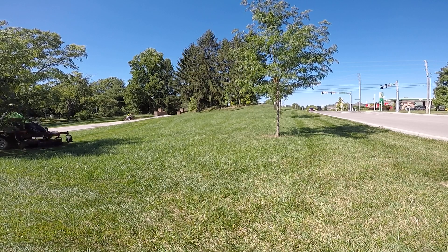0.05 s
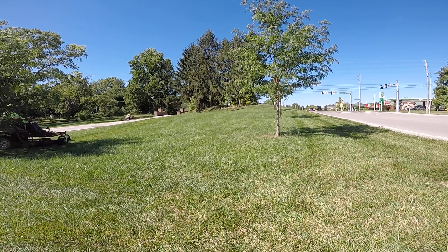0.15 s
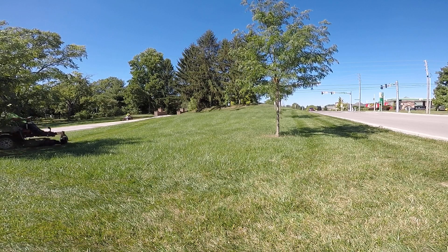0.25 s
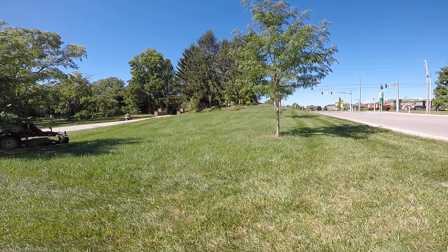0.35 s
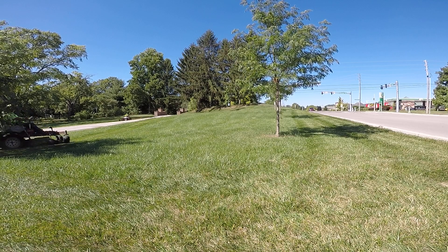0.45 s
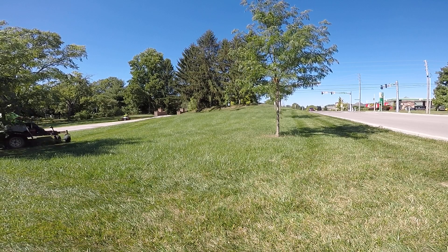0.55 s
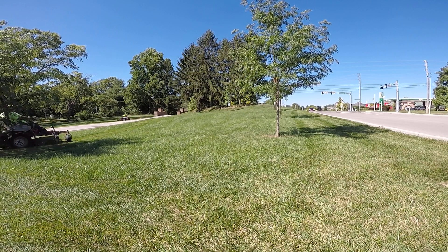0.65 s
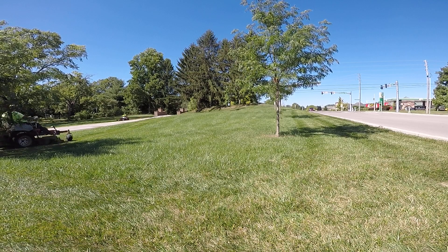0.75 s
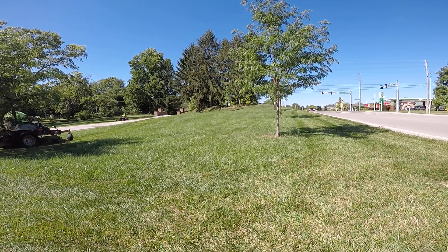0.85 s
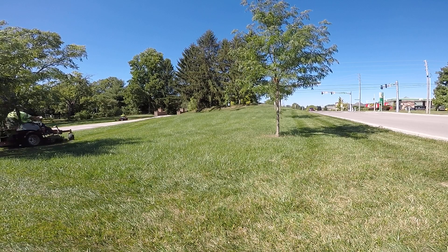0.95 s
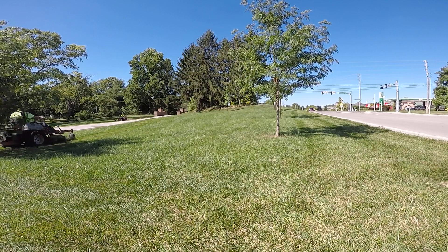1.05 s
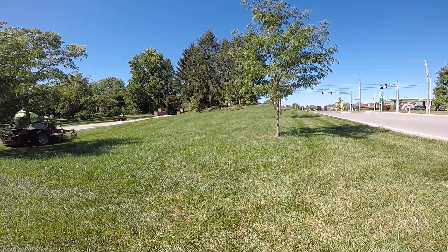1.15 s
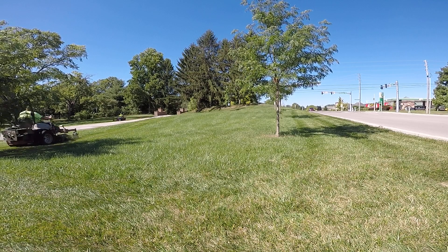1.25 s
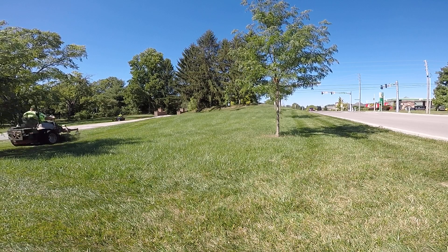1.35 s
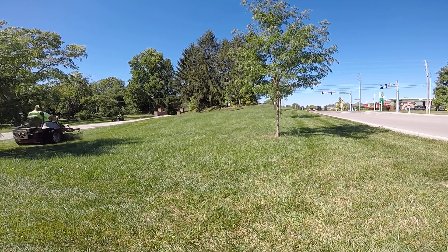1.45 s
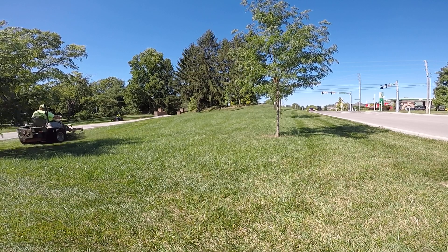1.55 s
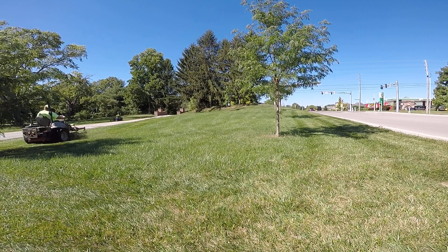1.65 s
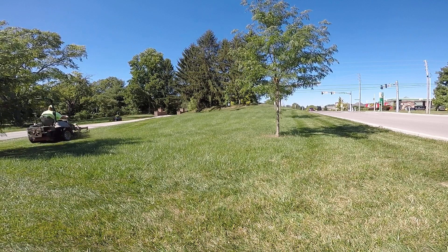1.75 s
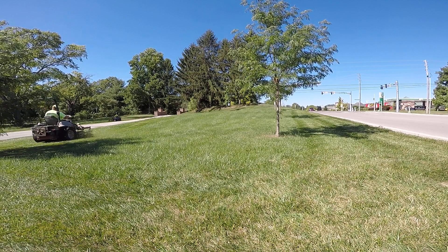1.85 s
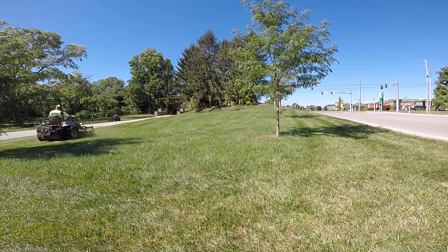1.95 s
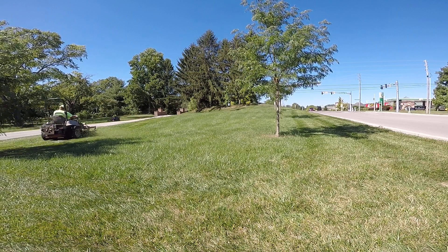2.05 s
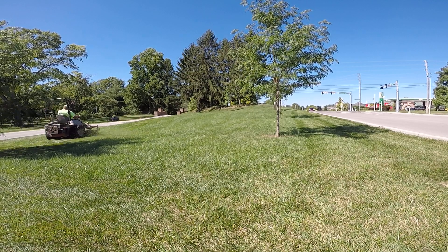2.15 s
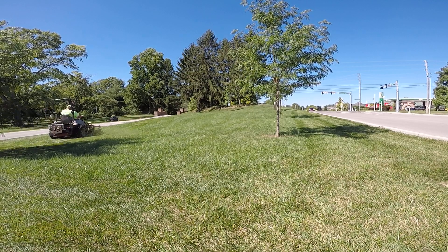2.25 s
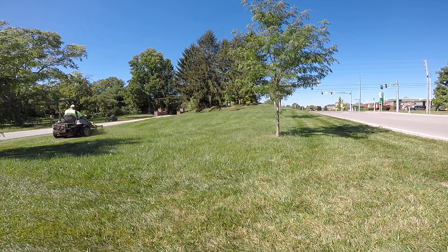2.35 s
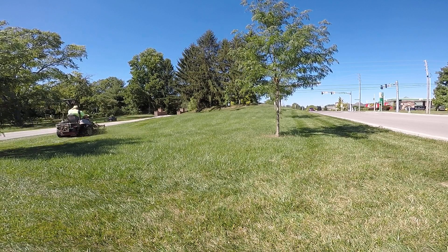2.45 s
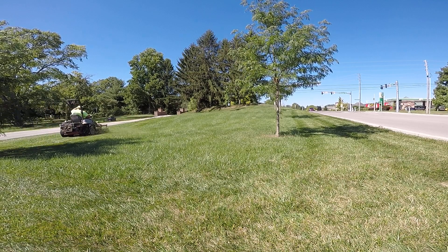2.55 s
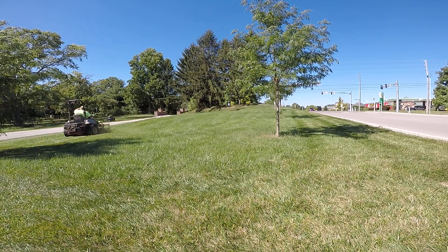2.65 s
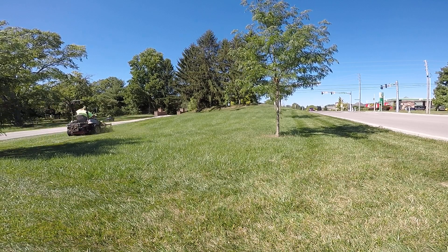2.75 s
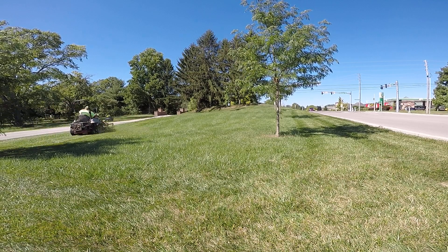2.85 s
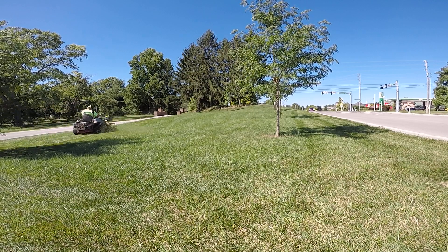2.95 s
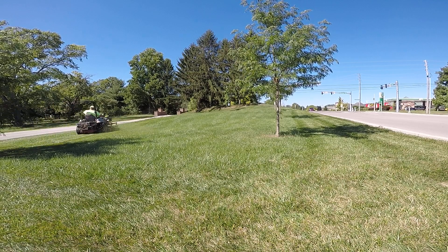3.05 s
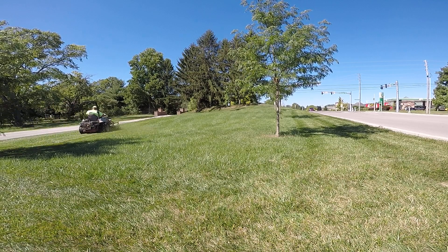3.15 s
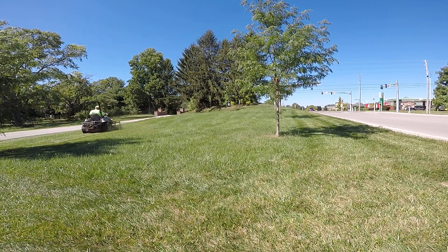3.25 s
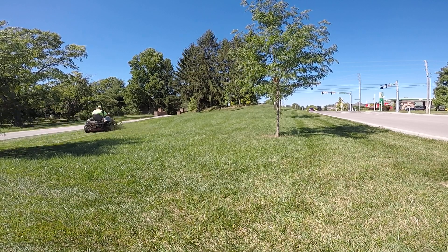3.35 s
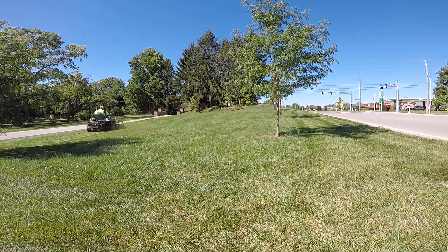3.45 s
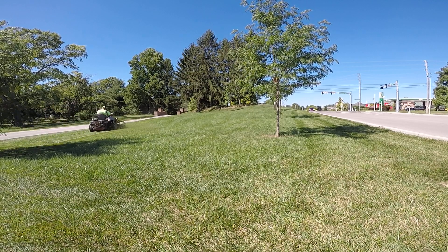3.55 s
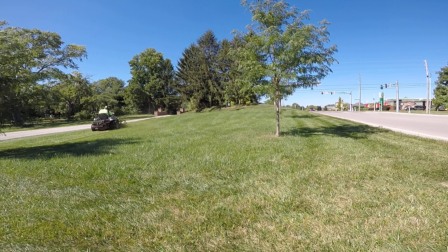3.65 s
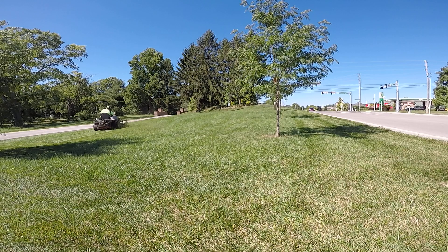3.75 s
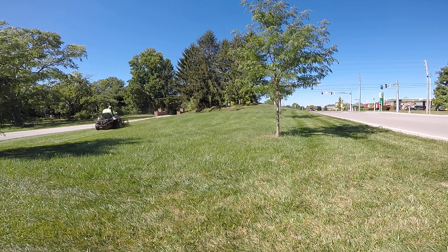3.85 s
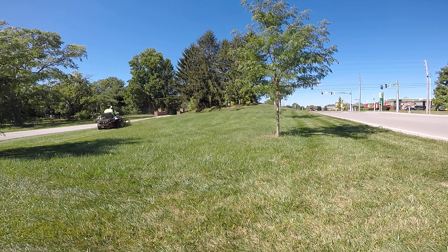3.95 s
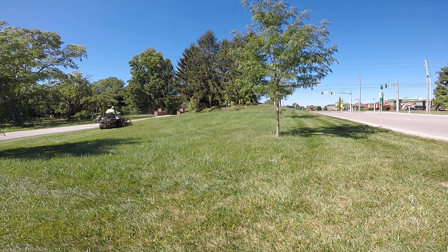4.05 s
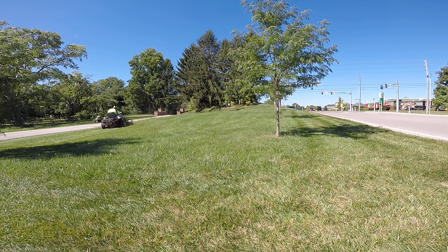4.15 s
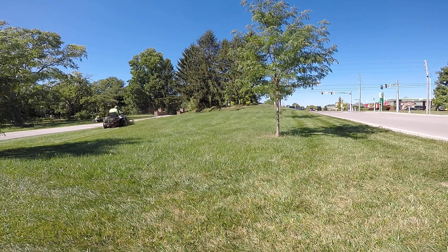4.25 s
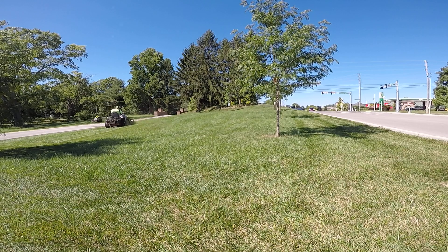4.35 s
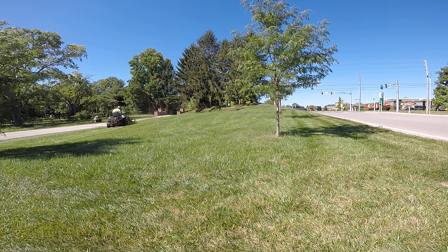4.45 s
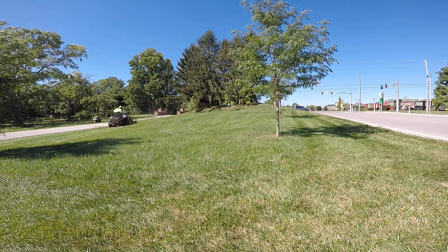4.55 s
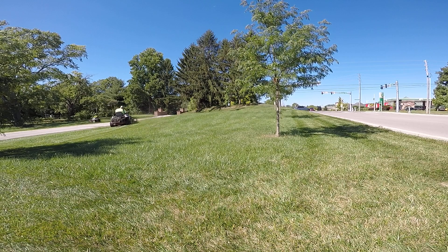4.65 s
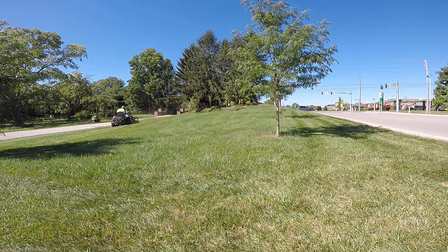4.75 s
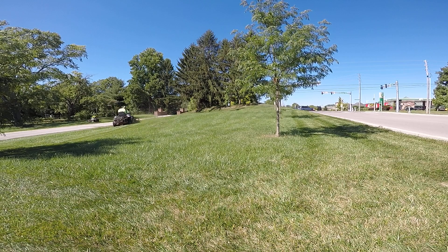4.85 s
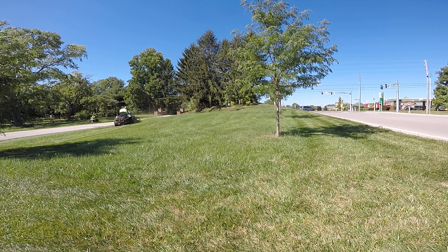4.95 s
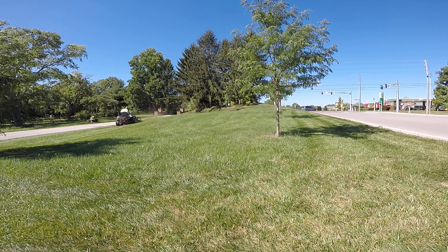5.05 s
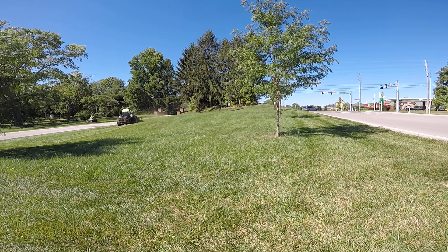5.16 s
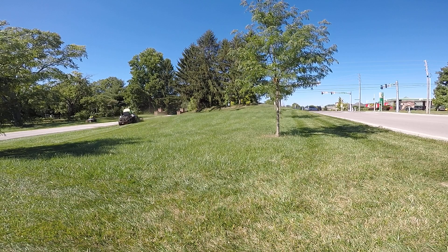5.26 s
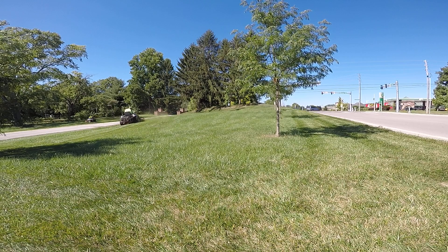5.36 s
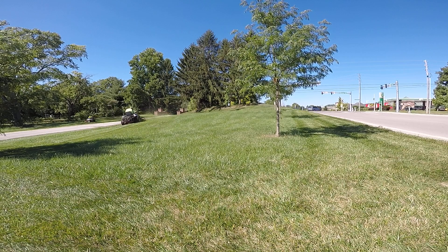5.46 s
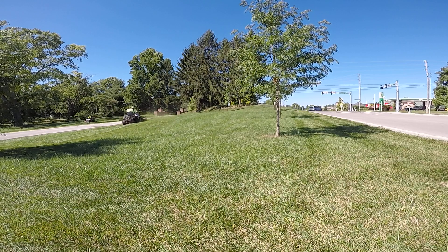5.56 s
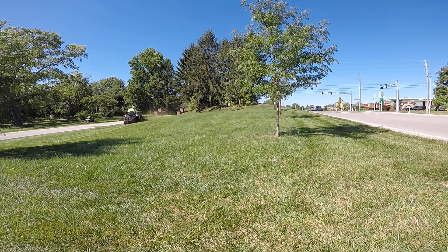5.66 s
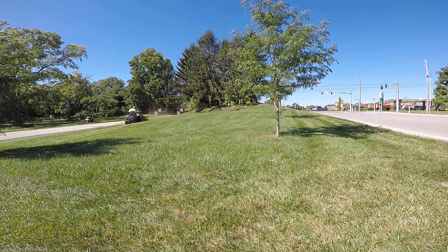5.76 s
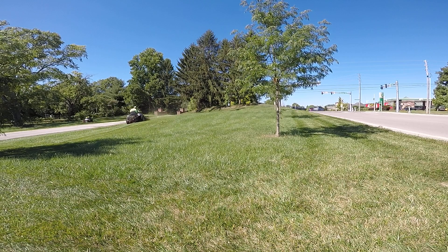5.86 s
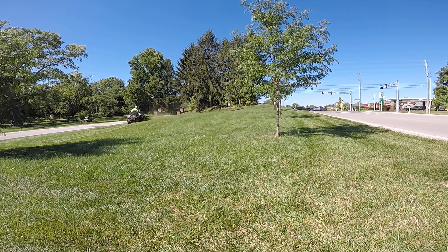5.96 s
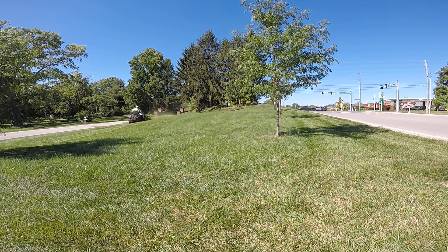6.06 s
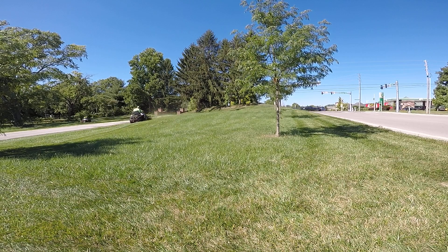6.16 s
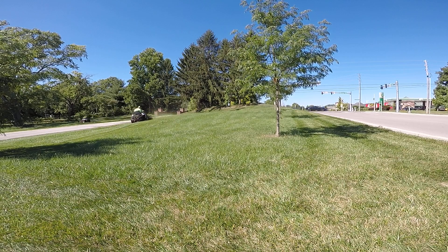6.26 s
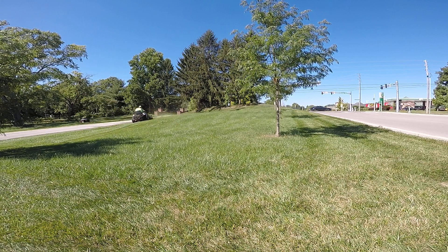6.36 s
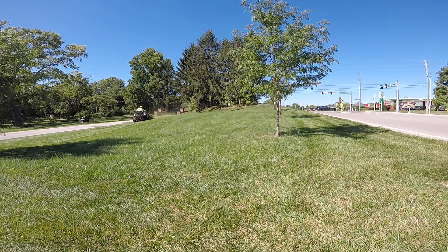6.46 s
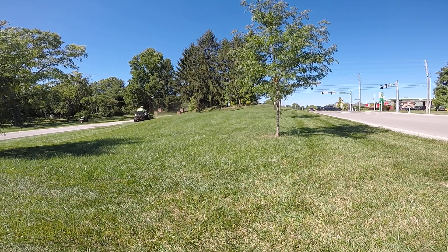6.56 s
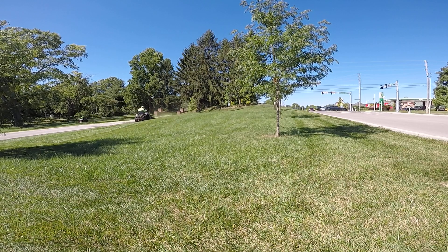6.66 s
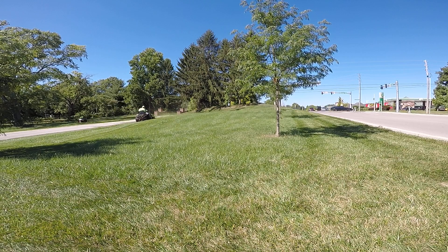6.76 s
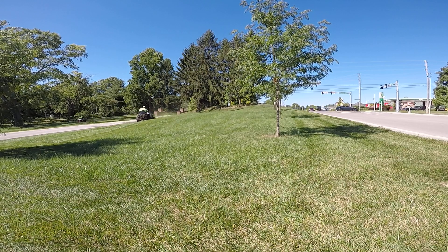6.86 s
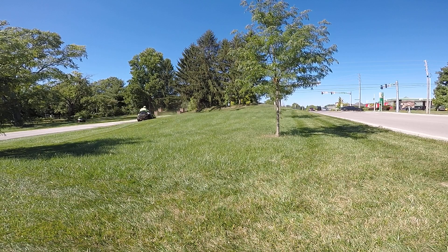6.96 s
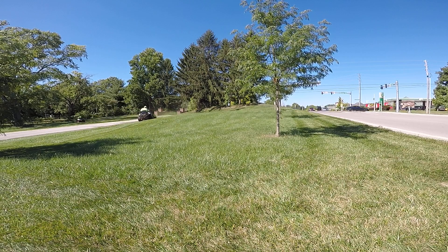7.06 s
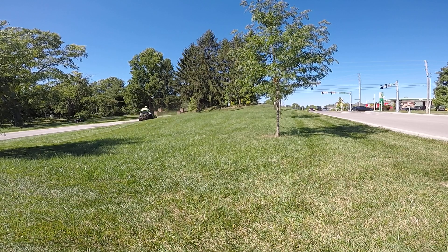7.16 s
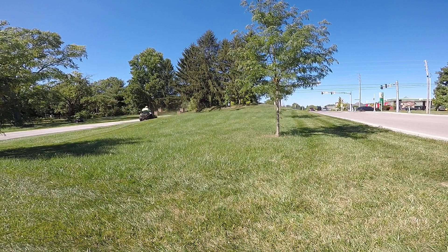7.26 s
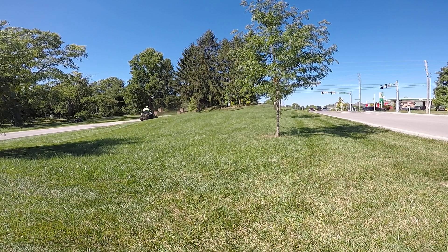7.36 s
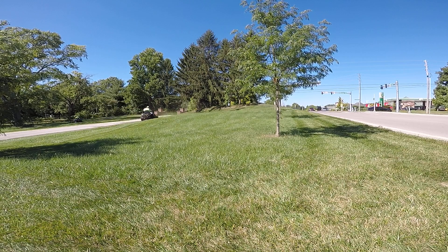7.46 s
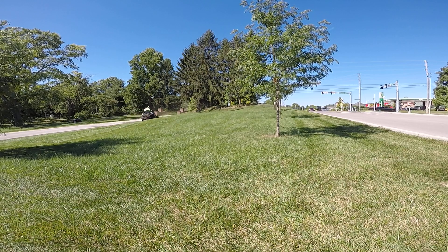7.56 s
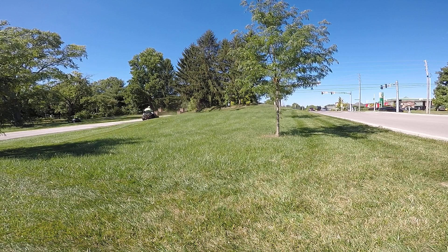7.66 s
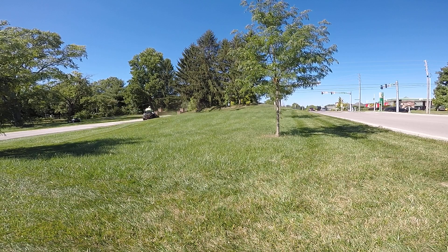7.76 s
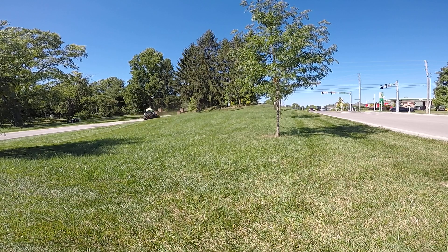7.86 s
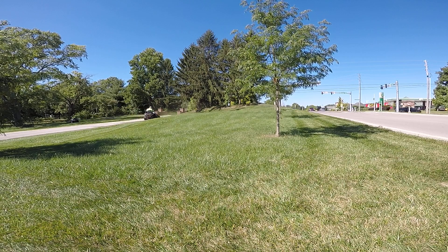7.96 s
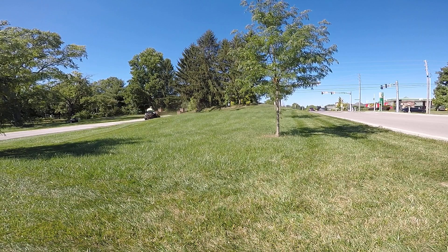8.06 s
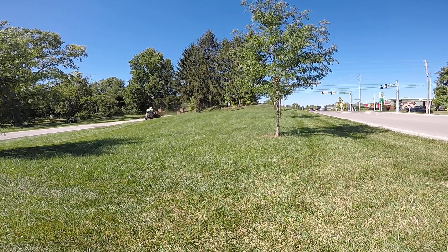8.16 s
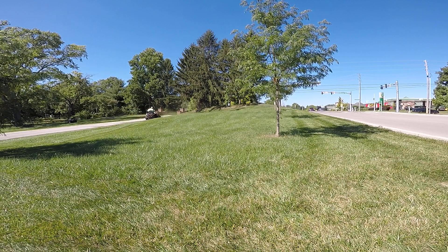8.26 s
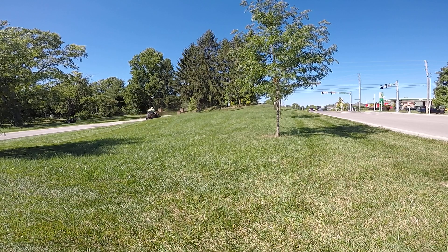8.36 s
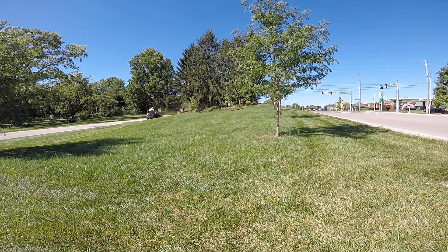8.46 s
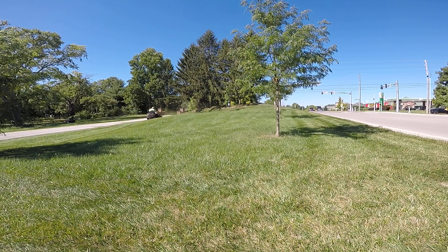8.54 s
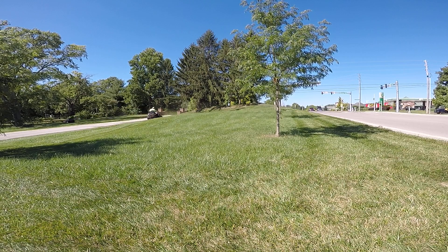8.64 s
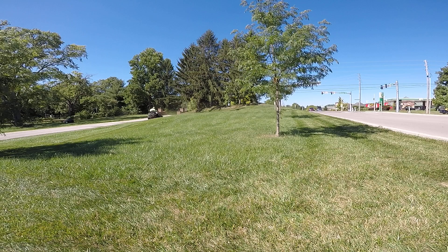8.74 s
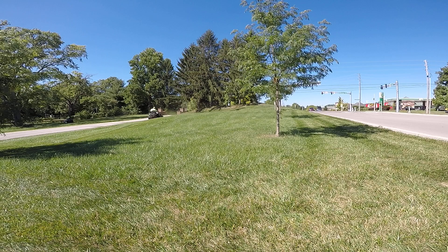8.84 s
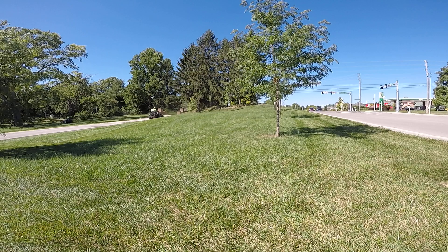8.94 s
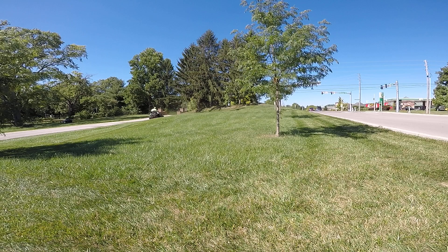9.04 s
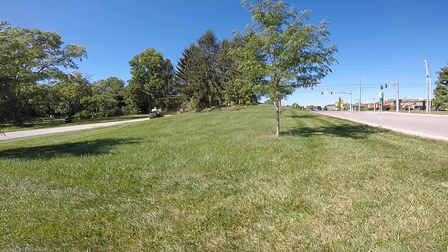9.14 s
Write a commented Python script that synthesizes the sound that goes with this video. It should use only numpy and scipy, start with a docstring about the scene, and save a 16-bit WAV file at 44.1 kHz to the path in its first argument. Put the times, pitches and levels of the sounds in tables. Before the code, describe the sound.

Outdoor stereo pickup on a roadside lawn: continuous mower engine drone with whirring blades and broad clattering noise, pitch sagging slightly in thick grass. The machine recedes, its low roar sinking quickly while chattering exhaust bursts stay present through the middle. Another mower out of sight adds a wavering hum and late hiss. Distant traffic is barely audible, with a few soft low wind swells.

```python
"""A riding mower drives off across a lawn beside a road while a second one works out of sight.
Each twin-cylinder engine fires unevenly, giving a stack of cycle harmonics and chopped, clattering noise;
belt-driven blades hum at their own rate, and the two machines beat against each other.
Behind them lie the filtered-noise wash of distant traffic and light wind, picked up at two ports."""
import sys
import numpy as np
from scipy import signal
from scipy.fft import rfft, irfft, next_fast_len
from scipy.io import wavfile
from scipy.ndimage import uniform_filter1d

SR = 44100
rng = np.random.default_rng(int(sys.argv[2]) if len(sys.argv) > 2 else 0)


def persist_wave(psi):
    """Save psi, clipped to +-1, as 16-bit WAV."""
    counts = np.round(np.clip(psi, -1, 1) * 32767).astype(np.int16)
    wavfile.write(sys.argv[1], SR, np.atleast_2d(counts).T)


N = 405719
TIME = np.arange(N) / SR

SECOND_FIRING = 3 / 8  # cycles: the second cylinder fires 270 of 720 degrees later
LEAVING_LAG, UNSEEN_LAG, CRANK_PHASE = .2043, -.023, .5  # cycles


def gain_of(db):
    """Decibels to amplitude."""
    return 10 ** (np.asarray(db) / 20)


def evened(x):
    """Scales to rms 1."""
    return x / np.sqrt(np.mean(x ** 2) + 1e-20)


def read(points, hz):
    """Joins (frequency [Hz], value) points on a log-frequency axis."""
    f, value = np.transpose(points)
    return np.interp(np.log(hz + 1), np.log(f + 1), value)


def curve(table):
    """A (time [s], value) table drawn out over the whole scene."""
    return np.interp(TIME, *np.transpose(table))


def wander(top_hz):
    """Slow random drift of rms 1, made by low-passing noise drawn 100 times a second."""
    steps = 1024
    hz = np.fft.rfftfreq(steps, 1 / 100)
    lowpass = 1 / np.sqrt(1 + (hz / top_hz) ** 8)
    slow = irfft(rfft(rng.standard_normal(steps)) * lowpass, steps)
    return np.interp(TIME * 100, np.arange(steps), evened(slow))


# Likeness of the noise at the two ports: (frequency [Hz], likeness [0-1])
PORT_LIKENESS = [(300, .995), (600, .95), (2000, .92), (6000, .85), (10000, .72)]


def noise(spectrum, envelope, band_hz, patchy_db, size=512):
    """Enveloped noise, coloured in drifting patches, partly unlike at the ports; rms 1 inside band_hz."""
    hz, _, z = signal.stft(rng.standard_normal((2, N)) * envelope, SR, nperseg=size)
    patches = uniform_filter1d(rng.standard_normal(z[0].shape), size=5, axis=0)
    patches = uniform_filter1d(patches, size=9, axis=1)
    same = np.clip(read(PORT_LIKENESS, hz), 0, 1)[:, None]
    z = np.array([z[0], same * z[0] + np.sqrt(1 - same ** 2) * z[1]])
    z *= gain_of(spectrum(hz)[:, None] + patchy_db * evened(patches))
    inside = (hz > band_hz[0]) & (hz < band_hz[1])
    share = np.sum(abs(z[0, inside]) ** 2) / np.sum(abs(z[0]) ** 2)
    return evened(signal.istft(z, SR, nperseg=size)[1][:, :N]) / np.sqrt(share)


def hum(turns, level_db, unsteady=1):
    """One sine whose level and phase wander slightly."""
    sway_db = .6 * unsteady * wander(6.9)
    drift = .018 * unsteady * wander(5.2)  # cycles
    return np.sqrt(2) * gain_of(level_db + sway_db) * np.cos(2 * np.pi * (turns + drift))


# Four-stroke cycle rate of the leaving mower, sagging in thick grass: (time [s], rate [Hz])
LEAVING_SPEED = [(0, 26.63), (.5, 27.35), (.8, 27.53), (1.2, 26.51), (1.55, 25.37), (2.05, 25.45),
                 (2.8, 26.59), (3, 26.14), (3.4, 26.16), (4, 25.4), (4.25, 25.78), (4.5, 25.52),
                 (4.8, 25.69), (5.3, 25.49), (5.8, 25.89), (7, 26.29), (7.8, 26.33), (8.4, 26.75),
                 (9.2, 27.0)]
# Cycle rate of the unseen mower, hunting up and down: (time [s], rate [Hz])
UNSEEN_SPEED = [(0, 28.45), (1.1, 28.25), (2.1, 27.03), (2.6, 27.6), (3.15, 28.62), (4, 27.03),
                (4.4, 28.214), (4.9, 28.394), (5.6, 27.944), (6.35, 26.814), (7.15, 28.244), (7.6, 28.164),
                (7.95, 27.754), (8.5, 28.424), (9, 27.554), (9.2, 27.764)]


def engine_turns(speed):
    """Running count of engine cycles, the integral of the cycle rate."""
    return np.cumsum(curve(speed)) / SR


# How squarely the tail points this way as the mower steers: (time [s], share [0-1])
FACING = [(0, 0.21), (.6, 0.15), (1.2, 0.28), (1.9, 0.73), (2.7, 0.47), (3.6, 0.89), (5.2, 1), (6.1, 0.92),
          (7.5, 0.07), (8.1, 0.31), (9.2, 0.2)]


def heard_db(start_db, facing_db, fade_db_per_s):
    """Level of one part of the leaving mower: up when its tail points this way, down with distance."""
    return start_db + facing_db * curve(FACING) - fade_db_per_s * TIME


# Muffler harmonics: (multiple of the cycle rate, leaving mower level [dB], unseen mower level [dB])
MUFFLER = [(1, -22, -13), (3, -7.5, -7), (4, -26, -4), (5, 0, -2), (6, -6, -4), (7, -9, -4),
           (8, -17.5, -7.5), (9, -14, -10.5), (10, -21.5, -19), (11, -17, -17.5), (12, -24.5, -43),
           (26, -32, -40), (28, -30, -40), (30, -45, -47), (32, -41, -47)]


def exhaust(turns, level_db, lag, order, dull_db=0):
    """Two uneven firings a cycle through the muffler; order picks the machine's column of MUFFLER."""
    out = np.zeros(N)
    for row in MUFFLER:
        k = round(row[0])
        # the pair of firings sets only the phase; the table holds the level
        pair_phase = np.angle(1 + 0.91 * np.exp(-2j * np.pi * k * SECOND_FIRING))
        harmonic_db = row[order] - dull_db * np.clip(k - 5, 0, 4)
        flutter = gain_of(harmonic_db + 1.2 * wander(9.8))
        out += flutter * np.cos(2 * np.pi * (k * (turns - lag) + 0.4) + pair_phase)
    return np.sqrt(2) * gain_of(level_db) * out


# Exhaust note: (start level turned aside [dB], gain when facing [dB], fade with distance [dB/s])
EXHAUST_LAW = (-23, 5.05, 0.29)


def leaving_exhaust(turns):
    """The leaving mower's exhaust note, duller when its tail points aside."""
    dull_db = 1 - curve(FACING)  # dB per multiple above the fifth, up to the ninth
    return exhaust(turns, heard_db(*EXHAUST_LAW), LEAVING_LAG, order=1, dull_db=dull_db)


# Crank tone: (start level turned aside [dB], gain when facing [dB], fade with distance [dB/s])
CRANK_LAW = (-24.5, 0.92, 0.32)


def leaving_crank(turns):
    """Deep tone once per crank turn, two to a four-stroke cycle."""
    return hum(2 * (turns - LEAVING_LAG) + CRANK_PHASE, heard_db(*CRANK_LAW))


# Level of the lowest blade partial: (time [s], level [dB])
LOW_HUM = [(0, -15), (1.3, -16.5), (2, -20), (2.8, -27), (4.4, -29), (5.4, -29), (6.2, -20), (6.8, -19.5),
           (7.4, -22.5), (8.2, -48), (8.7, -49), (9.2, -26)]
# Upper partials: (blade partial, first spindle level [dB], second spindle level [dB], loudest at [s],
#                  loss one second either side, growing with the square of time [dB])
BLADE_HUM = [(2, -24.5, -22, 2.6, .28), (2.5, -50, -33, 3.6, 6), (3, -34, -29.5, 1.2, .55),
             (4, -37, -30.5, .3, .36), (5, -43, -38, .6, 1.6), (6, -49, -48, 1.5, .6),
             (7.5, -56, -48, 1, .4), (8, -52, -52, 1.5, .6)]


def blades(turns):
    """Upper partials beat between two spindles, partial k beating k times as fast; the lowest swells."""
    passes = 3.689 * turns  # blade passes per engine cycle, set by the pulleys
    in_step_s = .52
    slip = .0102  # blade passes per engine cycle gained by the second spindle
    gained = slip * (turns - np.interp(in_step_s, TIME, turns))
    out = hum(passes - .25, curve(LOW_HUM))
    for k, first_db, second_db, loudest_s, fade in BLADE_HUM:
        pair = gain_of(first_db) + gain_of(second_db) * np.exp(2j * np.pi * k * gained)
        level_db = 20 * np.log10(abs(pair) + 1e-6) - fade * (TIME - loudest_s) ** 2
        pair_turns = np.angle(pair) / (2 * np.pi)
        out += hum(k * passes + rng.random() + pair_turns, level_db, unsteady=np.sqrt(k))
    return out


# First-cylinder firings that crack louder: (time [s], level [dB])
HARD_FIRINGS = [(3.192, 3), (3.652, 5), (3.808, 3), (4.277, 2.5), (4.355, 2.5), (4.395, 2.5), (4.511, 4),
                (4.704, 3.5), (4.822, 4), (4.863, 2.5), (4.978, 5), (5.056, 2.5), (5.094, 3.5), (5.331, 3),
                (5.409, 4), (5.487, 5), (5.683, 4.5), (5.759, 3.5)]


def strengths(turns, start, spread_db, hard=()):
    """Random amplitude of each firing, two a cycle; the hard ones are set apart."""
    strength = gain_of(spread_db * rng.standard_normal((int(turns[-1]) + 2, 2)))
    for s, db in hard:
        cycle = round(np.interp(s, TIME, turns) - start + 1)
        strength[cycle, 0] = gain_of(db)
    return strength


def puffs(turns, start, second_db, strength):
    """Envelope of rms 1: a quick burst at each firing, every one of its own strength."""
    out = np.zeros(N)
    for k, (at, db) in enumerate([(start, 0), (start + SECOND_FIRING, second_db)]):
        since = (turns - at) % 1  # cycles since this cylinder fired
        burst = (1 - np.exp(-since / .018)) * np.exp(-since / .13)
        cycle = np.floor(turns - at + 1).astype(int)
        out += gain_of(db) * strength[cycle, k] * burst
    return evened(out)


# Share of the noise power chopped by the firings: (time [s], share [0-1])
CHOP = [(0, 0.1), (1.3, 0.49), (1.9, 0.8), (2.5, 0.67), (3.5, 0.62), (5, 0.47), (6, 0.59), (7, 0.58),
        (8.2, 0.25), (9.2, 0.14)]


def chopped_bursts(firings):
    """Blends a steady level with the firing bursts, by power."""
    chopped = np.clip(curve(CHOP), 0, 1)
    return np.sqrt(1 - chopped + chopped * puffs(*firings) ** 2)


# Engine and casing heard together: (frequency [Hz], level [dB])
CLATTER = [(600, -1.9), (900, -3.5), (1150, -1.6), (1500, -0.0), (1900, -0.3), (2200, -4.6), (2450, -2.2),
           (2750, -6.0), (3000, -4.6), (3400, -6.8), (3700, -9.1), (4100, -15), (4250, -15.8),
           (4550, -12.2), (5200, -11.6), (5600, -12.9), (6000, -8.5), (6250, -10.5), (6500, -17.0),
           (6900, -12), (7700, -8.0), (8050, -12.8), (9000, -13.3), (10000, -16.5), (11300, -25.5),
           (12000, -25.8), (14500, -45.1)]
# Ringing shrouds and deck panels: (frequency [Hz], level [dB])
RINGS = [(1150, 4), (1480, 4), (1880, 3), (2420, 1.3), (3160, 1), (3600, 3), (4660, 3)]


def part(low_hz, high_hz):
    """The stretch of the clatter spectrum between two edges, with the panels ringing along."""
    def shape(hz):
        half_width = .035  # share of the pitch
        rings_db = sum(db / (1 + ((hz / f - 1) / half_width) ** 2) for f, db in RINGS)
        edges = (1 + (low_hz / (hz + 1)) ** 8) * (1 + (hz / high_hz) ** 8)
        return read(CLATTER, hz) + rings_db - 10 * np.log10(edges)
    return shape


# Clatter, then hiss: (start level turned aside [dB], gain when facing [dB], fade with distance [dB/s])
CLATTER_LAW = (-30, 5.55, 0.79)
HISS_LAW = (-39, 8.87, 0.061)
# Top fizz of the leaving mower: (time [s], level [dB])
FIZZ = [(0, -38), (1.1, -37), (1.7, -31.5), (2.5, -38), (3.5, -40), (5, -44), (9.2, -45)]


def clatter(bursts):
    """Three bands of engine and casing noise, each chopped to its own depth by the firings."""
    # the clatter rings, so it is less chopped
    mid = noise(part(1024, 3210), bursts ** 0.41, (1000, 2700), 1.0, size=1024)
    hiss = noise(part(2750, 8200), bursts ** .8, (2800, 8000), 1.0, size=512)
    fizz = noise(part(7130, 14600), bursts ** 0.67, (8500, 12000), 2.4, size=256)
    out = gain_of(heard_db(*CLATTER_LAW)) * mid
    out += gain_of(heard_db(*HISS_LAW)) * hiss
    return out + gain_of(curve(FIZZ)) * fizz


# Outlet resonances: (frequency [Hz], half width [Hz], level [dB])
TAILPIPE = [(1613, 49, 6), (3170, 180, -1.5), (4900, 280, -18)]
# Outlet noise: (start level turned aside [dB], gain when facing [dB], fade with distance [dB/s])
TAILPIPE_LAW = (-54.5, 18.4, 0.28)


def tailpipe(bursts):
    """Firing bursts of noise through the outlet resonances, far louder when the tail points this way."""
    def shape(hz):
        power = sum(gain_of(db) ** 2 / (1 + ((hz - f) / width) ** 2) ** 2 for f, width, db in TAILPIPE)
        return 10 * np.log10(power)
    return gain_of(heard_db(*TAILPIPE_LAW)) * noise(shape, bursts, (1000, 6000), 2.0, size=512)


# Panel knocks: (start level turned aside [dB], gain when facing [dB], fade with distance [dB/s])
KNOCK_LAW = (-45.5, 11.3, 0.6)


def knocks(turns, start, second_db, strength):
    """Each firing strikes the panels, which ring briefly, never in quite the same blend."""
    t60_s, jitter_s = .03, .0002
    vary_db, tilt_db = 2.5, -3.5  # spread per blow and panel; per octave above the lowest panel
    cycles = np.arange(len(strength))[:, None] - 1 + start + np.array([0, SECOND_FIRING])
    s = np.interp(cycles, turns, TIME) + jitter_s * rng.standard_normal(strength.shape)
    at = np.clip((s * SR).astype(int), 0, N - 1)
    t = TIME[:2048]
    out = np.zeros(N)
    for f, db in RINGS:
        blows = np.zeros(N)
        blow_db = np.array([0, second_db]) + vary_db * rng.standard_normal(at.shape)
        blows[at] = strength * gain_of(blow_db)
        decay = gain_of(db + tilt_db * np.log2(f / RINGS[0][0]) - 60 * t / t60_s)
        ring = decay * np.sin(2 * np.pi * f * t) * np.minimum(t / 0.00086, 1)
        out += signal.oaconvolve(blows, ring)[:N]
    return gain_of(heard_db(*KNOCK_LAW)) * evened(out)


# Low roar: (frequency [Hz], level [dB])
ROAR = [(100, 6.5), (210, 10.5), (330, 9.5), (450, 1.5), (600, -3), (900, -2.5), (1500, -14.5), (3000, -79)]
# Low roar: (start level turned aside [dB], gain when facing [dB], fade with distance [dB/s])
ROAR_LAW = (-29.5, 0.12, 1.77)


def roar():
    """Broad low noise from the leaving mower, sinking as it drives off."""
    return gain_of(heard_db(*ROAR_LAW)) * noise(lambda hz: read(ROAR, hz), 1, (420, 900), 1.0, size=2048)


# Exhaust turbulence: (frequency [Hz], level [dB])
RUMBLE = [(40, -25), (70, -12), (95, 1), (130, 1.5), (200, -2), (300, -8), (600, -50), (2000, -100)]


def rumble():
    """Exhaust turbulence as deep noise that follows the exhaust level."""
    level_db = heard_db(*EXHAUST_LAW) - 12
    return gain_of(level_db) * noise(lambda hz: read(RUMBLE, hz), 1, (40, 400), 0, size=4096)


# Exhaust note, then crank thump, of the unseen mower: (time [s], level [dB])
UNSEEN_EXHAUST = [(0, -52), (2, -35), (4, -36), (6.3, -36), (7.2, -29), (9.2, -35.5)]
UNSEEN_THUMP = [(0, -29), (2.6, -45), (3.4, -30), (4.5, -54), (6.3, -22), (7.3, -32), (9.2, -34)]
# Its blade hum as a whole: (time [s], level [dB])
UNSEEN_BLADES = [(0, -30), (1.2, -29), (2.6, -31), (3.4, -21.5), (4, -30), (4.8, -22), (5.5, -24.5),
                 (6, -29), (7.3, -20), (8, -19), (9.2, -21.5)]
# Its blade partials against that: (blade partial, level [dB])
UNSEEN_HUM = [(1, -1), (2, -13.5), (3, -20), (4, -27)]


def unseen_tones(turns):
    """Exhaust harmonics, crank thump and blade partials of the mower out of sight."""
    out = exhaust(turns, curve(UNSEEN_EXHAUST), UNSEEN_LAG, order=2)
    out += hum(2 * (turns - UNSEEN_LAG) + CRANK_PHASE, curve(UNSEEN_THUMP))
    passes = 3.7037 * turns - .38  # blade passes per engine cycle; phase in blade passes
    for k, db in UNSEEN_HUM:
        out += hum(round(k) * passes, curve(UNSEEN_BLADES) + db)
    return out


# The unseen mower turns its exhaust this way late on: (time [s], level [dB])
UNSEEN_FIZZ = [(6.2, -82), (7, -42.5), (9.2, -38.5)]


def unseen_fizz(turns):
    """High noise puffed by the unseen engine's firings."""
    bursts = puffs(turns, .9, 0.72, strengths(turns, .9, 1.5))
    fizz = noise(part(5000, 20000), bursts ** .7, (5000, 12000), 2.2, size=256)
    return gain_of(curve(UNSEEN_FIZZ)) * fizz


# Treble bands that change level partway through:
# (frequency [Hz], half width [Hz], early level [dB], late level [dB])
TREBLE_BANDS = [(3900, 210, 1, -2.5), (5100, 280, -1, -2.5), (6660, 340, -11, 5), (11900, 1400, 1, -11.5)]
# Progress from the early levels to the late ones: (time [s], share [0-1])
LATE_SHARE = [(3.6, 0), (5, 0.9), (6.4, 0.97)]


def shifted(x):
    """Bands of the treble rise or sink partway through."""
    hz, t, z = signal.stft(x, SR, nperseg=512)
    late = np.clip(np.interp(t, *np.transpose(LATE_SHARE)), 0, 1)
    db = 0
    for f, width, early_db, late_db in TREBLE_BANDS:
        band = np.exp(-((hz - f) / width) ** 2)
        db = db + np.outer(band, early_db + (late_db - early_db) * late)
    return signal.istft(z * gain_of(db), SR, nperseg=512)[1][:, :N]


# Wash of distant traffic: (frequency [Hz], level [dB])
ROAD = [(300, -20), (550, -1), (750, 9), (1000, -6), (1500, -21), (3000, -18)]


def road():
    """Distant traffic as a steady wash of filtered noise."""
    return gain_of(-48.5) * noise(lambda hz: read(ROAD, hz), 1, (500, 1200), 0.59, size=2048)


# Soft swells of wind: (middle [s], half length [s], level [dB])
GUSTS = [(.1, .3, -30), (3.55, .25, -31), (4.45, .25, -33), (5, .2, -33), (5.75, .2, -32)]


def wind():
    """Lumpy low pressure at the ports: a faint breeze with a few soft swells added by power."""
    power = gain_of(-46) ** 2
    for s, half, db in GUSTS:
        power = power + gain_of(db) ** 2 * np.exp(-((TIME - s) / half) ** 2)
    lumps = gain_of(1.5 * wander(6))
    # (frequency [Hz], level [dB])
    low = [(15, -23), (25, 2), (40, -4), (60, -8), (120, -20), (300, -75), (1000, -110)]
    return np.sqrt(power) * noise(lambda hz: read(low, hz), lumps, (15, 42), 0, size=4096)


def scene():
    """Both mowers, the road and the wind."""
    leaving, unseen = engine_turns(LEAVING_SPEED), engine_turns(UNSEEN_SPEED)
    tones = leaving_exhaust(leaving) + leaving_crank(leaving) + blades(leaving) + unseen_tones(unseen)
    start = .086  # cycles
    # turns, first firing [cycles], second cylinder level [dB], strengths
    firings = leaving, start, -5.5, strengths(leaving, start, .6, HARD_FIRINGS)
    bursts = chopped_bursts(firings)
    treble = clatter(bursts) + tailpipe(bursts) + knocks(*firings) + unseen_fizz(unseen)
    return tones + shifted(treble) + roar() + rumble() + road() + wind()


# The two ports: (frequency [Hz], left minus right level [dB], left lead [rad])
PORTS = [(50, -1.0, -0.25), (110, -2.2, -0.25), (250, -5.0, -0.2), (430, -9.7, 0.26), (560, -7.7, 1.36),
         (760, -1.2, 1.9), (1000, 3.9, 1.79), (1700, 7.8, 1.64), (2150, 13.0, 1.7), (2450, 4.2, 0.69),
         (2800, 7.1, 4.29), (3150, 0.9, 6.12), (3800, -1.3, 6.39), (4250, -0.5, 8.06), (4700, -6.0, 7.72),
         (6000, -3.1, 8.99), (7000, 0.1, 9.26), (8500, -0.8, 9.89), (11000, 0.7, 9.51), (15000, -0.8, 9.4)]


def record(dry):
    """The two ports differ in level and phase by frequency; then soft overload and the band limit."""
    size = next_fast_len(N + 4096)
    hz = np.fft.rfftfreq(size, 1 / SR)
    f, balance_db, lead = np.transpose(PORTS)
    ratio = gain_of(read(np.c_[f, balance_db], hz))
    turn = np.exp(.5j * read(np.c_[f, lead], hz))  # half the lead on each side
    ports = np.array([ratio * turn, 1 / turn]) * np.sqrt(2 / (1 + ratio ** 2))
    wet = irfft(rfft(dry, size) * ports, size)[:, :N]
    wet = 1.6 * np.tanh(wet / 1.6)  # the preamplifier rounds the highest peaks
    lowpass = signal.firwin(511, 15000, window=("kaiser", 9), fs=SR)  # edge in Hz
    return signal.oaconvolve(wet, lowpass[None], "same")


dry = scene()
out = record(dry)
persist_wave(out)
```